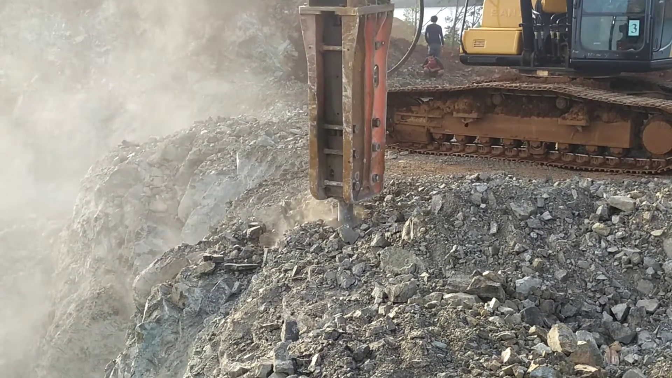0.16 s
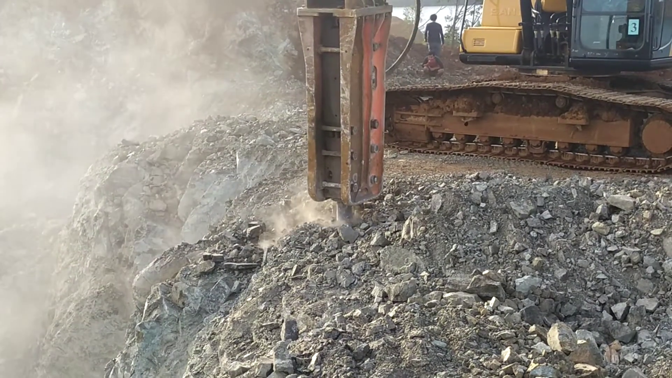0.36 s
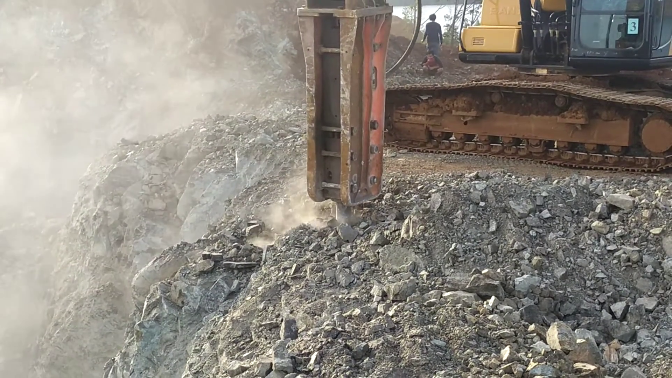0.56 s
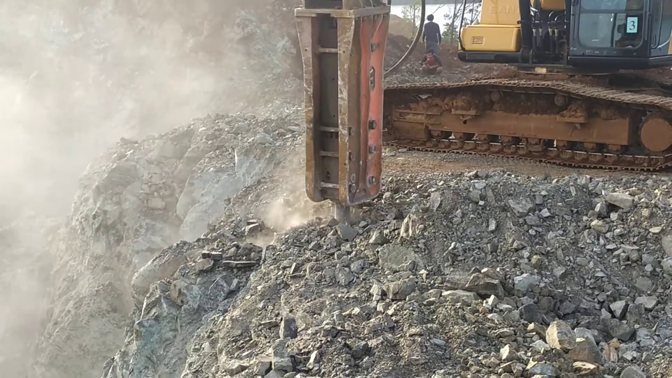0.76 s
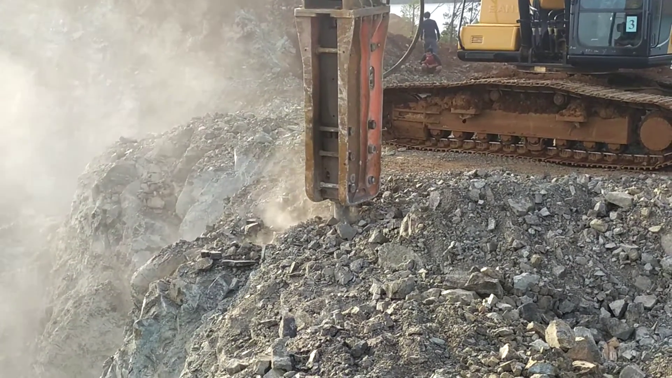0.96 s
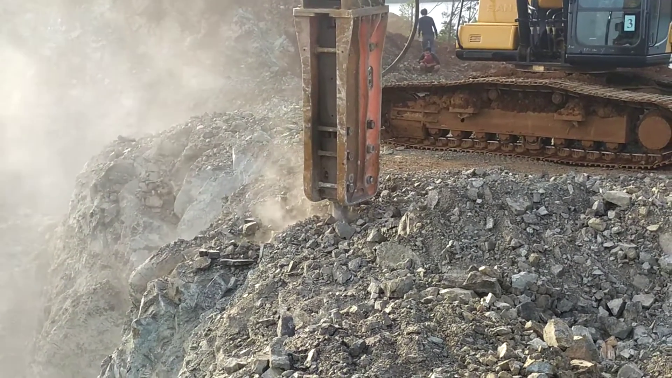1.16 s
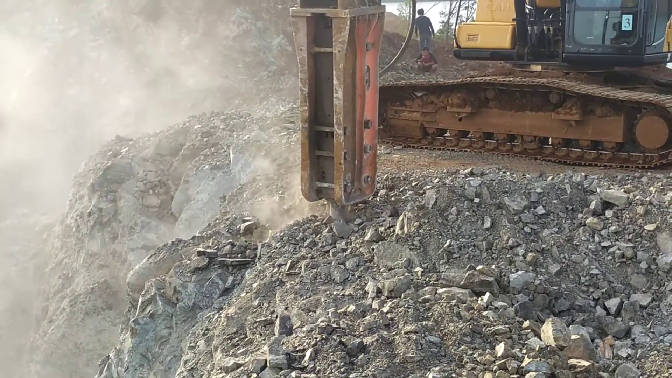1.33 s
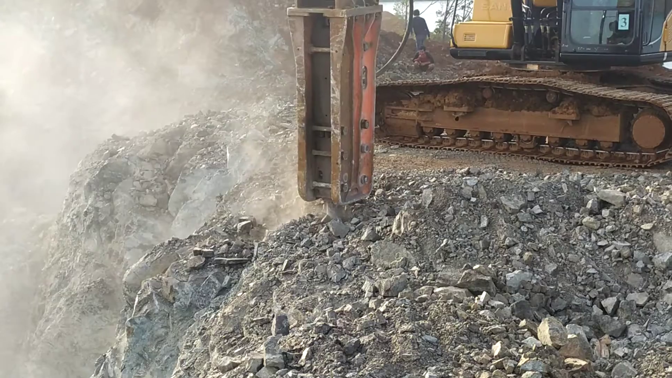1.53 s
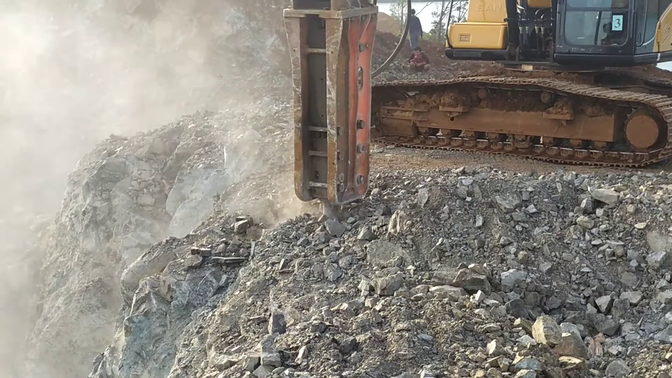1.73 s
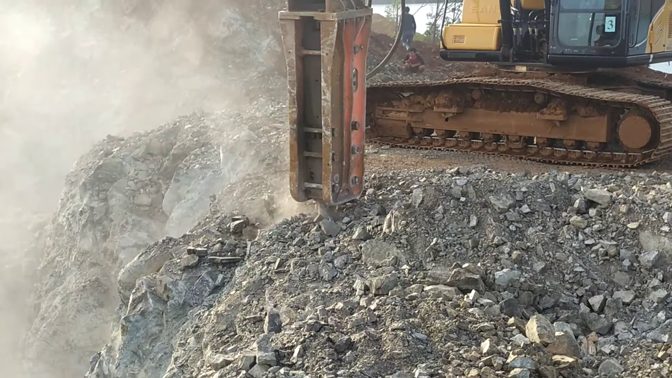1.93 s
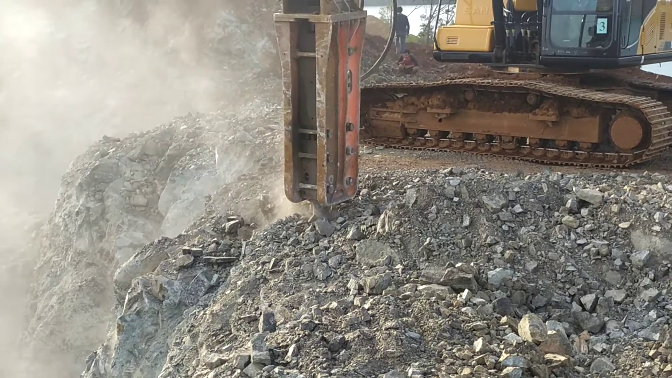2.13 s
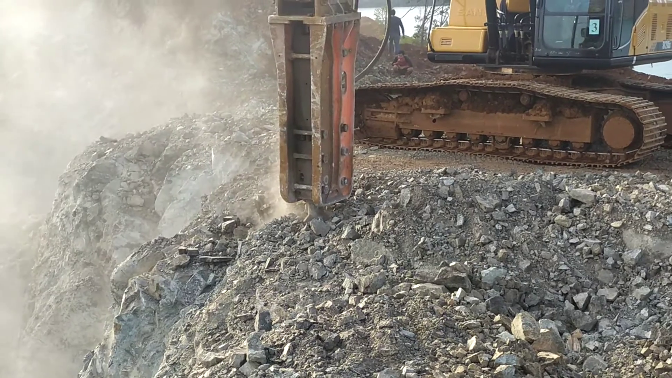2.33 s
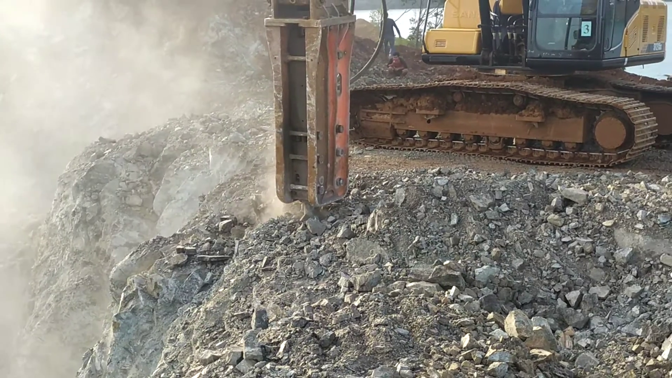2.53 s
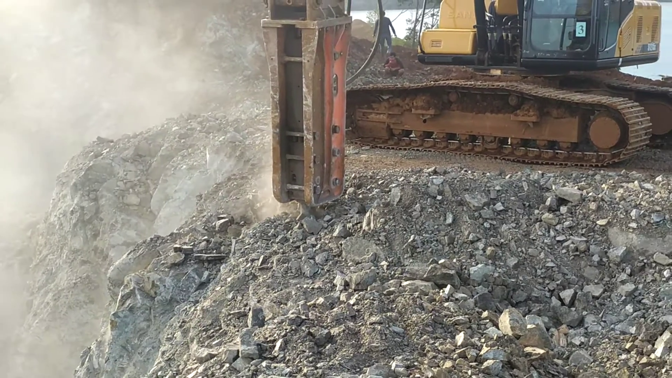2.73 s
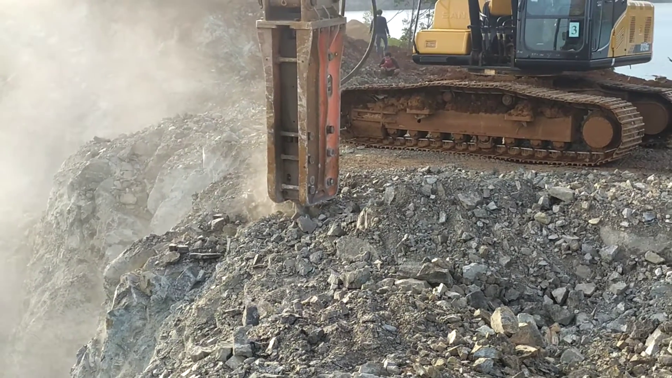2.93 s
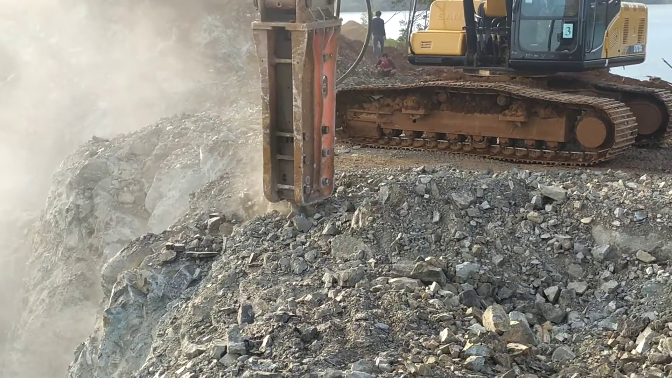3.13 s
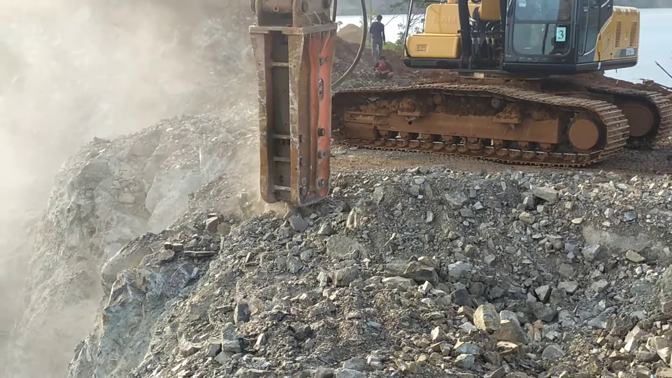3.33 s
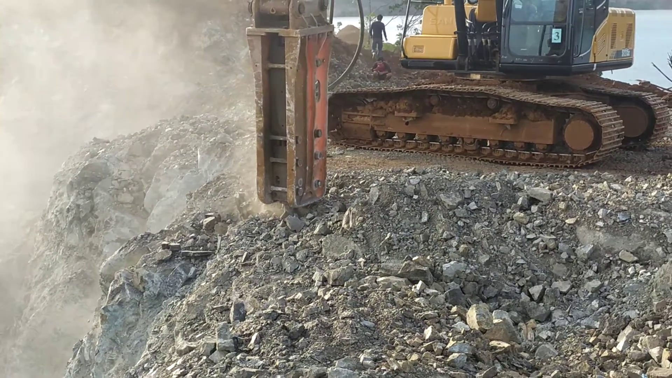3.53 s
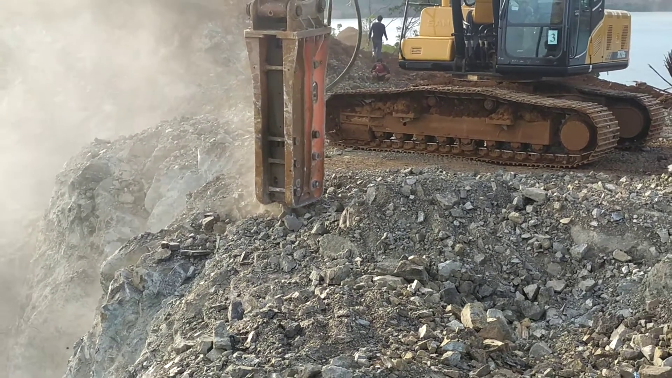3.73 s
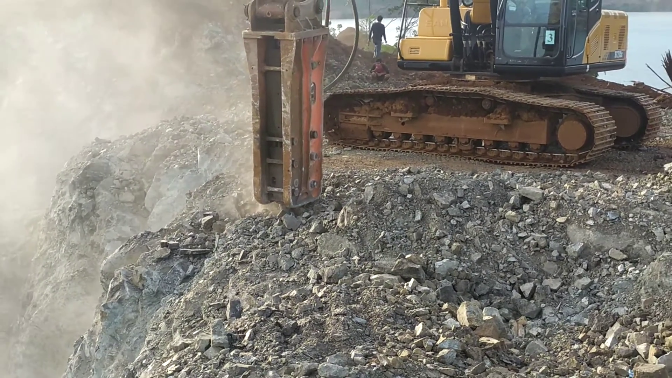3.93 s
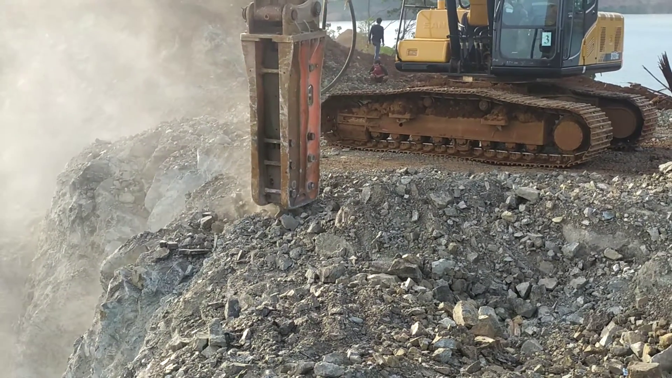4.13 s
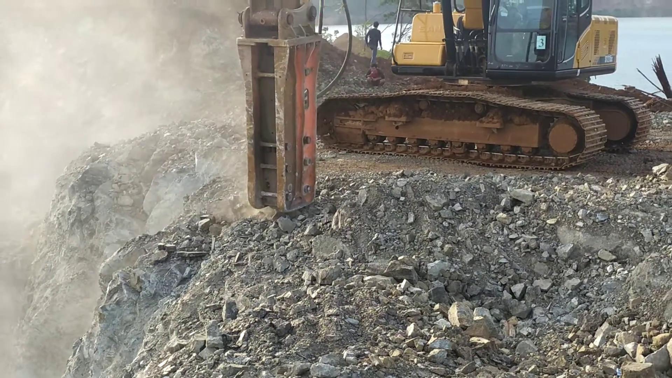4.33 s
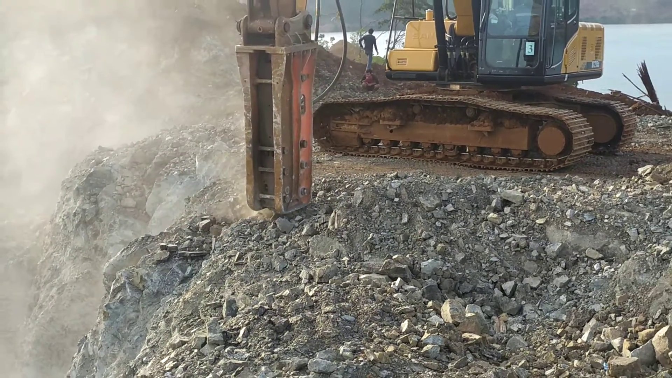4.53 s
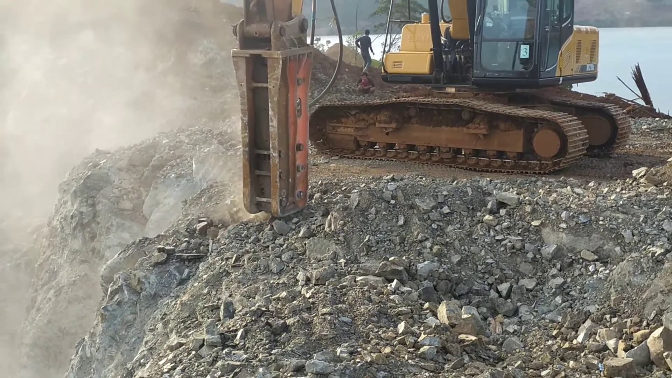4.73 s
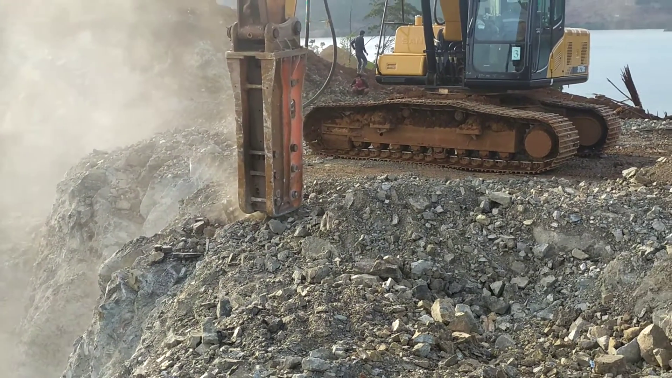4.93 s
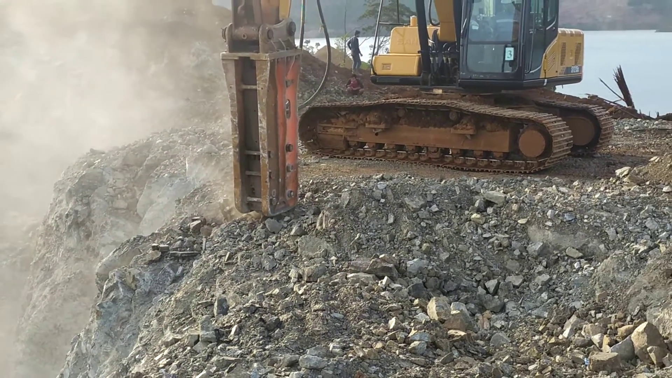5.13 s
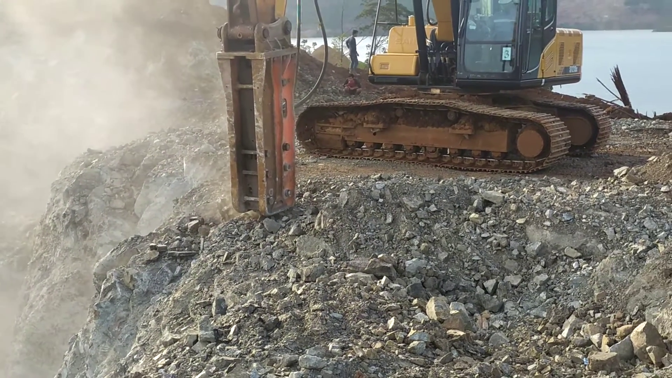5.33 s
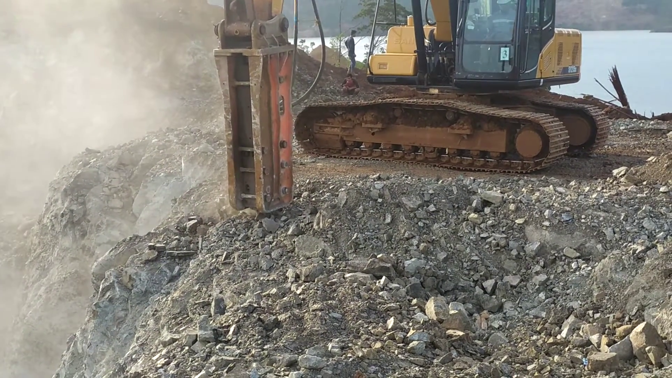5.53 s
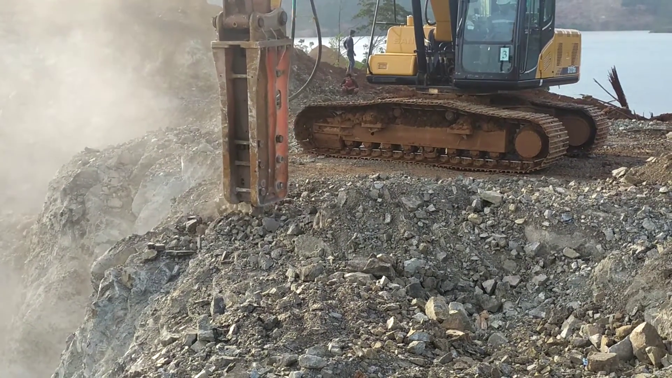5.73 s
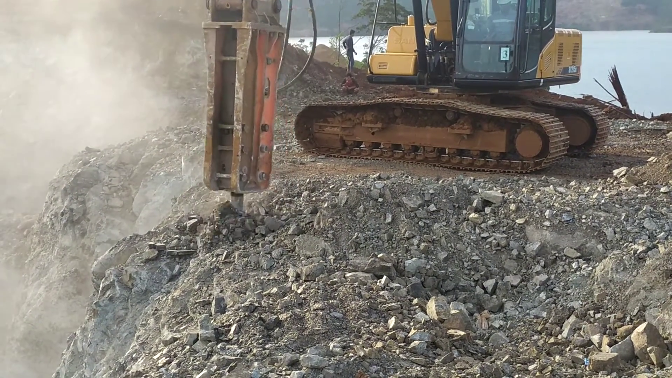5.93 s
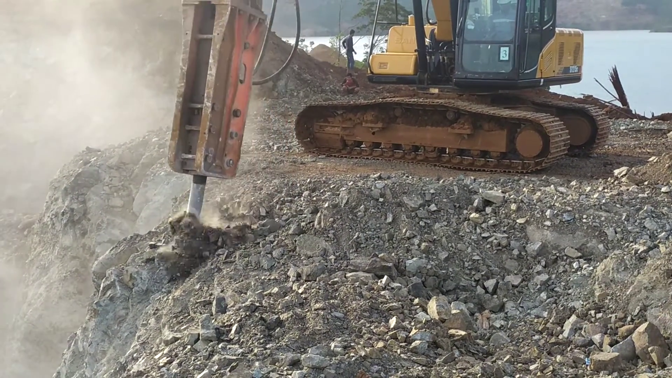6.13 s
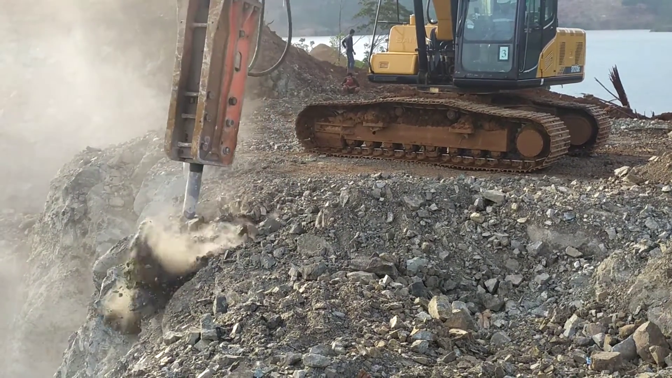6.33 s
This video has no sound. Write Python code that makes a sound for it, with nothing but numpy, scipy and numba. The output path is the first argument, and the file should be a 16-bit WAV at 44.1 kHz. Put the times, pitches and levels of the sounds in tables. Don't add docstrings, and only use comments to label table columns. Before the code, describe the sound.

A few irregular hits settle at once into a relentless metallic hammering, clattering and ringing with hardly any gap between blows. A diesel engine sits underneath, mostly masked. After about five seconds the hammer cuts out; its ring dies away, the engine idles low, wind buffets the phone, and the freed chisel scrapes and clanks on stone before a sharp rock crack. Close, open-air, phone-captured stereo leaning right.

```python
import sys
import numpy as np
from scipy import signal
from scipy.fft import rfft, irfft
from scipy.io import wavfile
from scipy.ndimage import uniform_filter1d
from numba import njit

SR = 44100
rng = np.random.default_rng(int(sys.argv[2]) if len(sys.argv) > 2 else 0)


def digitize_waveform(pressure):
    field = np.atleast_2d(pressure).T
    bounded = np.clip(field, -1, 1)
    quanta = np.round(bounded * 32767).astype(np.int16)
    wavfile.write(sys.argv[1], SR, quanta)


def natural_amplitude(level_db):
    exponent = np.asarray(level_db, float) / 20
    return 10 ** exponent


N = 284886

# f/Hz, density level/dB per Hz
ENGINE_SPECTRUM = [(24, -34), (40, -11.5), (136, -13.5), (207, -13), (309, -14.5), (407, -18), (438, -26),
                   (509, -24.5), (670, -15.5), (1310, -30.5), (2220, -32.5), (3220, -37), (4680, -31),
                   (8310, -43.5), (15500, -50.5)]
# f/Hz, width/Hz, level/dB
ENGINE_BAY = [(1610, 400, -15.5), (2240, 360, -14), (2820, 370, -16), (4850, 1300, -19),
              (5900, 1200, -16.5)]
# t/s, level/dB
ENGINE_LOAD = [
    (0, -9.5),
    (1, -23.5),
    (3, -21.5),
    (5.1, -15),
    (5.35, -27),
    (5.7, -24.5),
    (6.0, -25),
    (6.12, -27.5),
    (6.3, -22),
    (6.46, -22.5),
]
# t/s of the peak, level/dB, length/s
GUSTS = [(0.076, -20, 0.19), (0.275, -32, 0.048), (.43, -20, 0.044), (0.578, -18, 0.027),
         (0.713, -27, 0.068), (0.934, -19, 0.031), (2.712, -26, 0.021), (3.072, -20, 0.092),
         (3.33, -24, 0.024), (3.497, -25, .06), (4.05, -29, .04), (4.125, -21, 0.026), (4.272, -25, .04),
         (4.972, -29, 0.13), (5.373, -19.5, 0.066), (5.515, -15, 0.025), (5.632, -23, 0.073),
         (5.93, -33, 0.094), (6.39, -39, .06)]
# t/s, level/dB, f/Hz
PUFFS = [(3.323, 5, 60), (3.338, 1, 60), (5.345, -20, 100), (5.383, -11, 115), (5.415, -18, 95),
         (5.51, -5, 105), (5.609, -8, 99), (5.651, -7, 116), (5.78, -9, 135), (5.918, -17, 110),
         (5.96, -13, 120), (6.2, -17, 139), (6.331, -23, 156)]
# t/s, level/dB, length/s
SCRAPES = [
    (5.978, -28, 0.049),
    (5.66, -34, .02),
    (5.79, -32, 0.022),
    (6.157, -18.5, 0.017),
    (6.25, -23, .03),
]
# f/Hz, level/dB, T60/s
SCRAPE_MODES = [(4590, 8.5, 0.0095), (6400, 2, 0.0079), (2350, 2, 0.0091)]
# t/s, level/dB
CRACKS = [
    (5.498, -12.5),
    (6.2616, -2.5),
    (6.27, -12),
    (6.281, -8),
    (6.291, -11),
    (6.308, -22),
]
# f/Hz, level/dB, T60/s
STONE_MODES = [(326, -18, 0.018), (684, -6, 0.042), (940, -0.5, 0.04), (1540, -7, .05), (2220, -6, 0.075),
               (2807, -8.5, 0.078), (3630, -9, .04)]
# t/s, tap level/dB, slam delay/s, slam level/dB, plate and ground level/dB
STRAY_BLOWS = [
    (0.0, -27, .001, -12, -17),
    (0.012, -49, .005, -30, -9),
    (.1006, -7, 0.024, -4, -6),
    (0.235, -17, 0.0048, -53, -34),
]
# t/s, tap level/dB, slam delay/s, slam level/dB, plate and ground level/dB
LOOSE_CHISEL = [
    (5.497, -62, 0.00101, -47, -46),
    (6.157, -16.5, .014, -36, -26.5),
    (6.249, -30, 0.012, -31, -27.5),
    (6.283, -50, .004, -55, -40),
    (6.335, -49, 0.0046, -58, -51),
    (6.436, -37, 0.0098, -37, -23.5),
    (6.458, -42, .001, -39, -26),
]
# t/s, tap level/dB, slam level/dB, plate and ground level/dB, thud level/dB
SINKING = [(0, -6.5, -6.5, -5, -4), (.75, -9.5, -8, -7.5, 1), (1.1, -8.5, -10.5, -8, 5),
           (1.85, -15, -10.5, -9.5, 3), (2.4, -12.5, -10.5, -9.5, 4.5), (3.1, -11.5, -12.5, -9.5, 3),
           (3.55, -9, -11, -6.5, .5), (4.25, -13, -14.5, -9, -0.5), (4.75, -12, -13.5, -4.5, -4),
           (5.1, -13, -15.5, -8, -2.5), (6.1, -15, -7, -10, 2), (6.46, -19, -16, -8, 5)]
# f/Hz, level/dB, T60/s
CHISEL = [(1504, -3.5, 0.047), (3660, -23, 0.22), (5070, 3, 0.04), (7330, 1.5, 0.054), (7700, 5, 0.057),
          (8420, 0.5, 0.04), (9070, -1.5, 0.073)]
# f/Hz, level/dB, T60/s
HOUSING = [(1027, 1, 0.057), (1214, -1, 0.13), (1293, -6, 0.31), (1489, -2.5, 0.098), (1566, -3.5, 0.084),
           (1618, 7, 0.057), (2251, 0, 0.099), (2335, -4, 0.18), (2387, -9, 0.14), (2802, -0.5, 0.15),
           (2901, -0.5, 0.083), (3436, -10, 0.19), (4070, -2, 0.095), (4210, -0.5, 0.11),
           (4720, 3.5, 0.043), (5220, -6, 0.071), (5520, -6.5, 0.16), (7050, -4, 0.17), (8520, -0.5, 0.073)]
# f/Hz, level from tap/dB, level from slam/dB, T60/s
PLATES = [(628, -40, -10.5, 0.28), (717, -13.5, -9, 0.21), (734.6, -18.5, 0.5, 0.28), (752.2, -5, 4, 0.26),
          (785, -2.5, -6, 0.15), (848, -10, 1, 0.25), (916, -36, -1.5, 0.19), (964, -30, -13, 0.1)]
# f/Hz, level from tap/dB, level from slam/dB, T60/s
THUD = [(135, -19, -3.5, 0.17), (190.5, -9, -2, 0.14), (240, -6.5, -2, 0.084), (284.1, -10.5, -2, 0.12),
        (405.2, -24, -9.5, 0.26), (543.2, -43, -15, 0.3)]
# f/Hz, level from tap/dB, level from slam/dB, T60/s
FRAME = [(768, -3, -9, 0.05), (729.4, -19, 0.5, 0.2), (748, -21, -7.5, 0.13), (254, -8.5, -17, 0.02),
         (1660, -31, -18, 0.041), (2350, -26, -12, .06), (404.4, -20, -11, .16), (628, -22, -13, 0.17)]
# f/Hz, level/dB, T60/s
CHISEL_LINE = [(6345, -9, .5), (6375, -13, .35)]
# f/Hz, tap level/dB, tap T60/s, slam level/dB, slam T60/s
WASH = [(310, -47, 0.05, -7.5, 0.38), (523, -39, .06, -10, 0.42), (720, -14, 0.62, 6, 0.28),
        (1630, -5, 0.2, 8.5, 0.18), (1750, -20, .08, 4, 0.26), (2450, -9.5, 0.49, 10.5, 0.19),
        (4900, -6.5, 0.11, 8, 0.21), (8240, -0.5, 0.044, 8.5, 0.18), (10400, -2.5, 0.045, 4, 0.14),
        (15300, 4.5, 0.021, -1.5, 0.17)]
# f/Hz, coherence
ALIKE = [(100, 1), (600, 0.95), (1500, 0.59), (3000, 0.18), (6000, 0.51), (14000, 0.13)]
# t/s, left minus right level/dB at 8 kHz
TURN = [
    (0.0, -8.5),
    (1.15, -5.5),
    (2.32, -7),
    (2.88, -10),
    (4.1, -16.5),
    (4.32, -21),
    (5.33, -23),
    (5.94, -24),
    (6.26, -14),
    (6.46, -19),
]
# f/Hz, share of the shading
SHADE = [(60, 0.1), (400, 0), (750, -0.2), (1300, 0.23), (2400, 0.33), (4400, 0.53), (8000, 0.9),
         (15000, 14)]
# f/Hz, phase/rad
LEAD = [(0, 0), (860, -0.94), (1210, -2.5), (1640, -0.98), (2240, -5), (3270, -10.5), (4310, -4.5),
        (4740, -2.5), (7410, -18.5), (8960, -17), (9560, -26.5), (10500, -24.5), (11900, -5), (15700, -66)]


def on_log(hz, table):
    f, *columns = np.transpose(table)
    return [np.interp(np.log(hz), np.log(f), c) for c in columns]


def band(x, hz, octaves):
    edges = [hz * 2 ** (-octaves / 2), min(hz * 2 ** (octaves / 2), .49 * SR)]
    return signal.sosfilt(signal.butter(2, edges, "band", fs=SR, output="sos"), x)


def pair(hz, a, b):
    alike = np.clip(on_log(hz, ALIKE)[0], 0, 1)
    return np.array([alike * a + np.sqrt(1 - alike ** 2) * b, a])


def strikes(s, db):
    x = np.zeros(N)
    np.add.at(x, np.clip((s * SR).astype(int), 0, N - 1), natural_amplitude(db))
    return x


def fade(x, t60, rise):
    fall = np.exp(-np.log(1000) / (t60 * SR))
    up = np.exp(-1 / (rise * SR))
    return signal.lfilter([1 - up], [1, -up], signal.lfilter([1], [1, -fall], x))


def walk(rate):
    k = int(1000 / rate)
    ms = np.repeat(rng.standard_normal(7000 // k + 1), k)
    ms = uniform_filter1d(uniform_filter1d(ms, k), k)
    return 1.3 * np.interp(np.arange(N) / SR * 1000, np.arange(len(ms)), ms)


@njit
def resonate(x, hz, t60):
    y, z, p = np.empty(len(x)), 0j, 0j
    for i in range(len(x)):
        if i % 64 == 0:
            p = np.exp(2j * np.pi * hz[i] / SR - np.log(1000) / (t60 * SR))
        z = z * p + x[i]
        y[i] = z.imag
    return y


def steady_modes(drive, modes, offset_db):
    return sum(natural_amplitude(db + offset_db) * resonate(drive + 1e-18, np.full(N, 1. * hz), t60) for hz, db, t60 in modes)


def wind():
    t = np.arange(N) / SR
    breeze_db, gust_rise = -29.5, 0.98
    gusts = 0
    for s, db, length in GUSTS:
        width = length * np.where(t < s, gust_rise, 1)
        gusts = gusts + natural_amplitude(db) * np.exp(-((t - s) / width) ** 2)
    a, b = band(rng.standard_normal((2, N)), 63.5, 2.18) * natural_amplitude([2.4 * walk(25), 1.6 * walk(21)])
    out = np.array([natural_amplitude(-3) * (0.5 * a + 0.63 * b), a])
    pops = 0
    for s, db, hz in PUFFS:
        pops = pops + resonate(strikes(np.array([s]), db) + 1e-18, np.full(N, 1. * hz), 0.032)
    return out * (natural_amplitude(breeze_db) + gusts) / out.std() + natural_amplitude([[-4], [0]]) * pops


def diesel(db):
    firing_hz, swell_db, bay_flicker_db = 60.5, 1.1, 2.2
    cycle = np.cumsum(firing_hz * (1 + .03 * walk(8.5)) / SR)
    strength = natural_amplitude(6.5 * rng.standard_normal(1000))[cycle.astype(int)]
    gate = 1 + 0.44 * strength * np.exp(-(cycle % 1) / 0.45)
    out, swell = 0, walk(3.11)
    for hz in 45 * 2 ** np.arange(0, 8.5, 1 / 3):
        noise = band(gate * rng.standard_normal((2, N)), hz, 1 / 3)
        level = on_log(hz, ENGINE_SPECTRUM)[0] + swell_db * swell + 1.6 * walk(17)
        out = out + natural_amplitude(level) * pair(hz, *noise)
    out = out / out.std()
    for hz, width, bay_db in ENGINE_BAY:
        noise = band(gate * rng.standard_normal((2, N)), hz, width / hz)
        out = out + natural_amplitude(bay_db + bay_flicker_db * walk(12)) * pair(hz, *noise) / noise.std()
    return out * natural_amplitude(db)


def scraping():
    grit = 0
    for s, db, length in SCRAPES:
        grit = grit + fade(strikes(np.array([s]), db), 3 * length, 0.0079) * rng.standard_normal(N)
    return steady_modes(grit, SCRAPE_MODES, -12.5)


def stones():
    return steady_modes(strikes(*np.transpose(CRACKS)), STONE_MODES, -6.5)


def blows():
    count, recoil_s, scatter_db = 42, .0193, 0.74
    first_s, period_s = .2517, .11687
    spin_up_lag_s, spin_up_blows = .06756, 4.09
    tires_from_blow, tiring_s = 24.54, .000089
    n = np.arange(count)
    s = first_s + period_s * n
    s = s + spin_up_lag_s * (1 - np.exp(-n / spin_up_blows))
    s = s + tiring_s * np.maximum(n - tires_from_blow, 0) ** 2
    when, *dbs, _ = np.transpose(SINKING)
    levels = np.array([np.interp(s, when, db) for db in dbs])
    tap, slam, plate = levels + scatter_db * rng.standard_normal((count, 3)).T
    return np.transpose([s, tap, np.full(count, recoil_s), slam, plate])


def repeat(hits, responses, slip):
    angle = slip * walk(1.471) + 0.44 * walk(9)
    weights = np.cos(angle), np.sin(angle)
    return sum(signal.fftconvolve((hits * w)[None], r, axes=1)[:, :N] for w, r in zip(weights, responses))


def ring(hits, modes, knock, rattle_db, rattle_t60, wander=0.0011):
    t = np.arange(SR // 4) / SR
    bursts = 1000 ** (-t / rattle_t60) * rng.standard_normal((len(hits), 2, 2, len(t)))
    rattles = [natural_amplitude(rattle_db) * repeat(h, b, slip=0.58) for h, b in zip(hits, bursts)]
    out = 0
    for k, (hz, *dbs, t60) in enumerate(modes):
        pitch = hz * (1 + wander * (walk(3.905) + walk(40)))
        sign = (-1) ** k
        drive = 0
        for db, h, r in zip(dbs, hits, rattles):
            drive = drive + natural_amplitude(db) * (sign * knock * h + pair(hz, *r))
        drive = drive * natural_amplitude(2.5 * walk(7))
        out = out + np.array([resonate(d + 1e-18, pitch, t60) for d in drive])
    return out


def frame(pushes):
    bend, bend_t60_s = .025, 0.13
    stress = np.minimum(fade(1. * (pushes[0] > 0), bend_t60_s, .001), 1)
    out = 0
    for hz, tap, slam, t60 in FRAME:
        drive = natural_amplitude(tap) * pushes[0] + natural_amplitude(slam) * pushes[1] + 1e-18
        out = out + resonate(drive, hz * (1 + bend * stress + 0.0069 * walk(9)), t60)
    return out


def wash(taps, slams, fresh):
    tap_rise_s, slam_rise_s = 0.002, 0.0045
    t = np.arange(SR // 2) / SR
    tapped, slammed, new = 0, 0, 0
    for hz in 300 * 2 ** np.arange(0, 5.8, 1 / 3):
        tap, tap_t60, slam, slam_t60 = on_log(hz, WASH)
        noise = band(rng.standard_normal((2, N)), hz, 1 / 3) * np.sqrt(SR / hz) * natural_amplitude(3.4 * walk(55))
        both = pair(hz, *noise)
        parts = both[:, :4 * len(t)].reshape(2, 2, 2, -1).transpose(1, 2, 0, 3)
        tap_decay = 1000 ** (-t / tap_t60) * (1 - np.exp(-t / tap_rise_s))
        slam_decay = 1000 ** (-t / slam_t60) * (1 - np.exp(-t / slam_rise_s))
        tapped = tapped + natural_amplitude(tap) * tap_decay * parts[0]
        slammed = slammed + natural_amplitude(slam) * slam_decay * parts[1]
        envelope = natural_amplitude(tap) * fade(taps, tap_t60, tap_rise_s) + natural_amplitude(slam) * fade(slams, slam_t60, slam_rise_s)
        new = new + min(fresh * hz / 4000, 1) * envelope * both
    return repeat(taps, tapped, slip=0.46) + repeat(slams, slammed, slip=0.53) + new


def breaker():
    s, tap_db, delay, slam_db, plate_db = np.concatenate([STRAY_BLOWS, blows(), LOOSE_CHISEL]).T
    taps, slams = strikes(s, tap_db), strikes(s + delay, slam_db)
    pushes = strikes(s, plate_db), strikes(s + delay, plate_db)
    when, *_, thud_db = np.transpose(SINKING)
    thud_gain = natural_amplitude(np.interp(np.arange(N) / SR, when, thud_db))
    out = ring([taps], CHISEL, knock=0.096, rattle_db=-23.5, rattle_t60=0.052, wander=.008)
    out = out + natural_amplitude(-2) * ring([slams], HOUSING, knock=0.4, rattle_db=-22.0, rattle_t60=0.15)
    out = out + ring(pushes, PLATES, knock=0.99, rattle_db=-34, rattle_t60=0.083, wander=0.0027)
    out = out + frame(pushes)
    out = out + thud_gain * ring(pushes, THUD, knock=0.78, rattle_db=-32, rattle_t60=0.15)
    out = out + ring([slams], CHISEL_LINE, knock=.4, rattle_db=-26, rattle_t60=.14, wander=.0006)
    return out + natural_amplitude(-2.5) * wash(taps, slams, fresh=0.66)


def ports(x, turn_db):
    f = np.fft.rfftfreq(N, 1 / SR)
    shifted = rfft(x[0]) * np.exp(1j * np.interp(f, *np.transpose(LEAD)))
    centres = np.log(np.transpose(SHADE)[0])
    left = 0
    for k, (hz, share) in enumerate(SHADE):
        part = np.interp(np.log(f + 1), centres, np.arange(len(SHADE)) == k)
        left = left + irfft(shifted * part, N) * natural_amplitude(share * turn_db)
    return np.array([left, x[1]])


def scene():
    t = np.arange(N) / SR
    engine_db = np.interp(t, *np.transpose(ENGINE_LOAD))
    turn_db = np.interp(t, *np.transpose(TURN))
    machine = breaker() + scraping() + stones() + diesel(engine_db)
    return ports(machine, turn_db) + wind()


@njit
def limit(x, top, ratio, attack, release):
    gain, e = np.empty(x.shape[1]), top
    for i in range(x.shape[1]):
        now = max(abs(x[0, i]), abs(x[1, i]))
        e += (now - e) * (attack if now > e else release)
        gain[i] = (top / max(e, top)) ** (1 - 1 / ratio)
    return gain


def top_cut(x):
    return signal.sosfilt(signal.butter(12, 15900, fs=SR, output="sos"), x)


def record(dry):
    x = signal.sosfilt(signal.butter(4, 53, "high", fs=SR, output="sos"), dry)
    attack_s, release_s = .0018, .045
    x = x * limit(x, .42, 3.0, 1 / (attack_s * SR), 1 / (release_s * SR))
    x = np.clip(1.2 * x, -1.5, 1.5)
    finished = x - x ** 3 * 4 / 27
    return top_cut(finished)


dry = scene()
out = record(dry)
digitize_waveform(out)
```